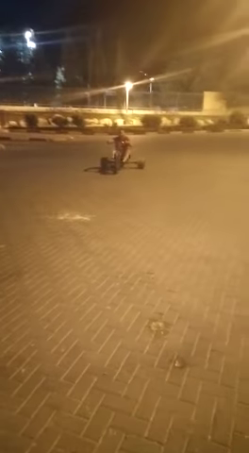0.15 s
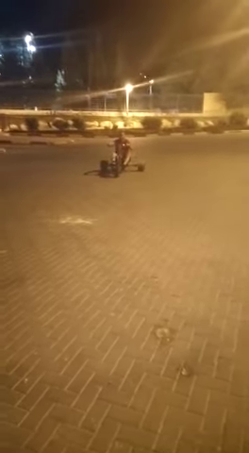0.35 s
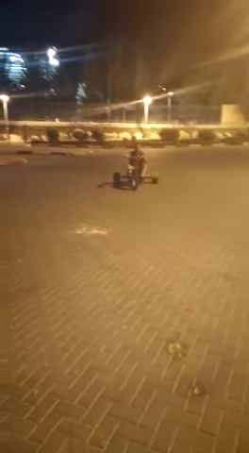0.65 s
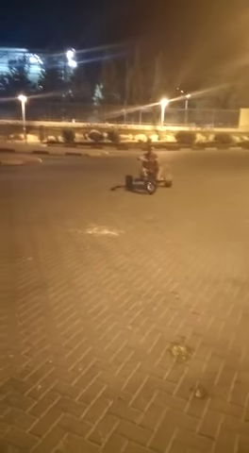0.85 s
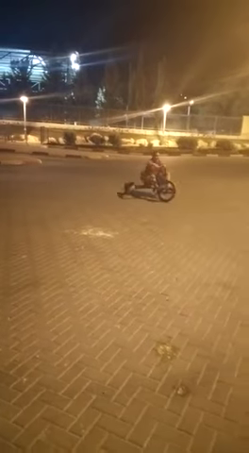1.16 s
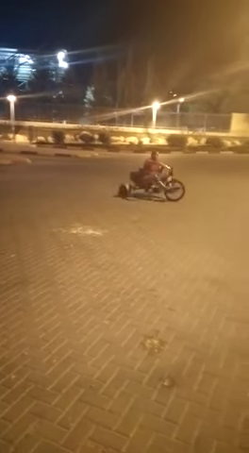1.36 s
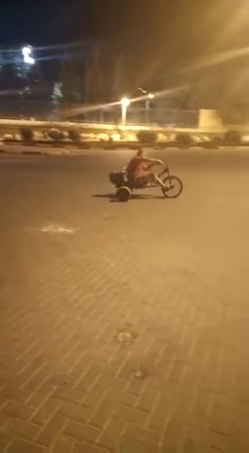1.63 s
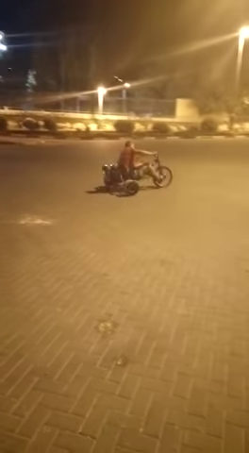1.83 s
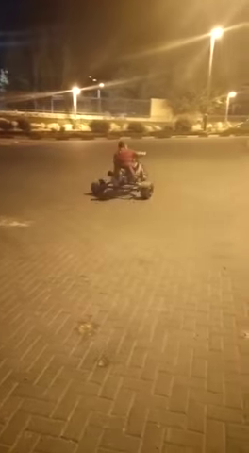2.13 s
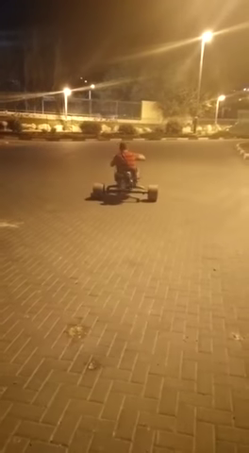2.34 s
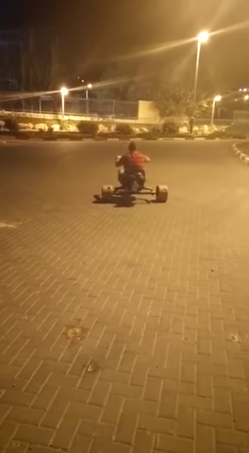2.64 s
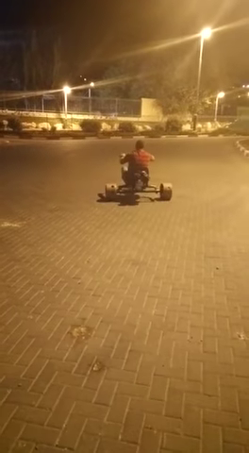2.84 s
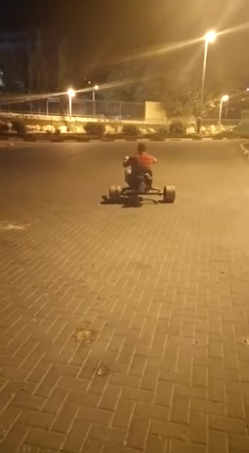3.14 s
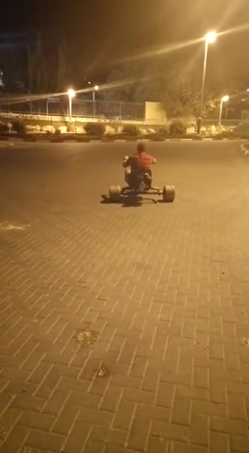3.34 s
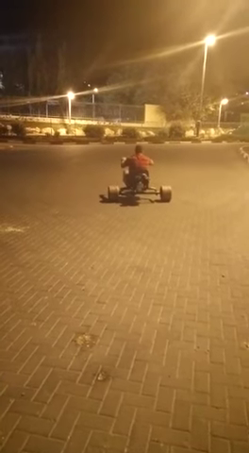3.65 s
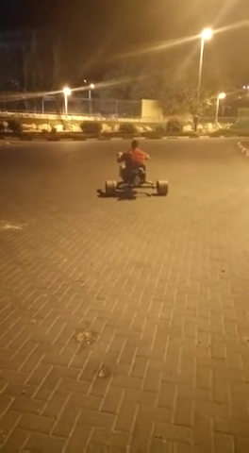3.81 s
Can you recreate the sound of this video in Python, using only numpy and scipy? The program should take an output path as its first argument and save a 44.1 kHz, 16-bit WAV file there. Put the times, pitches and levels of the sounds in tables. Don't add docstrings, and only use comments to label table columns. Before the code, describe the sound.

Small single-cylinder trike engine putters, dips, then revs in bursts as its wheels slide over paving

```python
import sys
import numpy as np
from scipy import signal
from scipy.fft import rfft, irfft, next_fast_len
from scipy.io import wavfile
from scipy.ndimage import uniform_filter1d, map_coordinates

SR = 44100
rng = np.random.default_rng(int(sys.argv[2]) if len(sys.argv) > 2 else 0)


def ratio(d):
    e = np.asarray(d, float) / 20
    return 10 ** e


def waveform_to_disk(signal):
    frames = np.transpose(np.atleast_2d(signal))
    scaled = np.clip(frames, -1, 1) * 32767
    samples = np.round(scaled).astype(np.int16)
    wavfile.write(sys.argv[1], SR, samples)


N = 175518


def unit(x):
    return x / np.sqrt(np.mean(x ** 2) + 1e-20)


def along(points, hz):
    f, v = np.transpose(points)
    return np.interp(np.log(hz + 1), np.log(f + 1), v)


def curves(rows):
    s, *cols = np.transpose(rows)
    return [np.interp(np.arange(N) / SR, s, c) for c in cols]


def wobble(rate):
    knots = rng.standard_normal(int(N * rate / SR) + 4)
    return map_coordinates(knots, [np.arange(N) * rate / SR])


def filtered(x, response):
    m = next_fast_len(x.shape[-1] + 8192)
    spectrum = rfft(x, m) * response(np.fft.rfftfreq(m, 1 / SR))
    return irfft(spectrum, m)[..., :x.shape[-1]]


def peak(f, hz, width):
    return 1j * f * width / (hz * hz - f * f + 1j * f * width)


def hollow(f, resonances, power):
    return sum((-1) ** k * ratio(db) * peak(f, hz, width) ** power
               for k, (hz, width, db) in enumerate(resonances))


def hiss(spectrum, tilt_db=0):
    shape = lambda f: ratio(along(spectrum, f) + tilt_db * np.log2(f / 4000 + 1e-3))
    return unit(filtered(rng.standard_normal(N), shape))


def beats(cycle, place, delay, gain):
    scatter_db, jitter_s = 1.1, .00025
    at = np.flatnonzero(np.diff(np.floor(cycle - place)) > 0)
    chance = rng.standard_normal((len(at), 2))
    late = np.round((delay + jitter_s * chance[:, 0]) * SR).astype(int)
    out = np.zeros(N)
    out[np.clip(at + late, 0, N - 1)] = gain[at] * ratio(scatter_db * chance[:, 1])
    return out


def thump(pushes, hz, width):
    one = filtered(np.eye(1, 4096)[0], lambda f: peak(f, hz, width) ** 3)
    return signal.fftconvolve(pushes, one / np.abs(one).max())[:N]


# (time [s], rate [cycles/s])
PACE = [(0.0, 23.63), (0.378, 23.63), (0.733, 19.15), (0.935, 21.89), (1.467, 22.49), (1.65, 20.79),
        (1.763, 22.74), (2.1, 16.39), (2.554, 15.49), (2.705, 23.0), (2.892, 19.33), (3.072, 22.44),
        (3.197, 20.72), (3.366, 23.73), (3.514, 20.18), (3.67, 24.02), (3.854, 21.66), (3.98, 22.19)]
# (time [s], opening [0-1])
THROTTLE_HAND = [(0, 0.45), (.45, 0.47), (.7, 0.28), (.9, 0.5), (1.79, 0.51), (1.88, 0.35), (2.55, 0.03),
                 (2.6, 0.39), (2.76, 0.95), (2.81, .05), (2.91, 0.18), (2.97, 0.62), (3.06, 0.72),
                 (3.13, 0.34), (3.36, 0.81), (3.42, 0.26), (3.495, 0.23), (3.515, 0.63),
                 (3.54, 0.5), (3.66, 0.83), (3.8, 0.45), (3.87, 0.43), (3.98, 0.5)]
# (time [s], tailpipe [dB], engine side [dB], housing [dB])
TURNING = [(0, -10.5, -0.5, -0.5), (.4, -16.5, -1, -1), (.6, -3.5, 1, -1.5), (.7, -11.5, 0, -3.5),
           (.9, -9.5, -0.5, -1.5), (1.3, -11, 0, -1.5), (1.8, -3.5, 1.5, -5), (2.04, -7.5, 2, -7),
           (2.1, -5, -5, -0.5), (2.17, -1, -0.5, -5), (2.28, 1.5, -4, -7), (2.55, 0.5, 1.5, -12),
           (2.6, 0, 0, -14), (2.87, 0, 0.5, -13), (3.3, 0, 0, -12.5), (3.46, 0, 3.5, -9),
           (3.6, 0, -1, -8.5), (3.98, 2, -1.5, -3)]


def crank():
    cycle = .6 + np.cumsum(curves(PACE)[0]) / SR
    throttle = np.clip(curves(THROTTLE_HAND)[0], 0, 1)
    return cycle, throttle, *curves(TURNING)


def blowdown(cycle, throttle, pipe_db):
    level_db, lead_s = -15, .0026
    blow = thump(beats(cycle, 0, -lead_s, throttle * ratio(level_db + pipe_db)), 175, 380)
    return filtered(blow, lambda f: 1 + ratio(13) * peak(f, 103.3, 23.7) / 2)


def back_breath(cycle, throttle, pipe_db):
    level_db, lead_s = -25, .0002
    pull = (1 - throttle) ** 2 * ratio(level_db + pipe_db)
    return -thump(beats(cycle, 0, -lead_s, pull), 135.4, 190)


# (place [cycle], level throttle shut [dB], level throttle open [dB], resonance [Hz], width [Hz])
BREATHS = [
    (0.2263, -41, -20.5, 194, 204),
    (.53, -40, -23, 308, 193),
    (.83, -46, -24, 314, 222),
    (0.01, -44.5, -29, 291, 140),
    (0.13, -33.5, -40.5, 68, 83),
]


def gulps(cycle, throttle, side_db):
    out = np.zeros(N)
    for place, shut_db, open_db, hz, width in BREATHS:
        level_db = shut_db + (open_db - shut_db) * np.sqrt(throttle) + side_db
        out -= thump(beats(cycle, place, 0, ratio(level_db)), hz, width)
    return out


# (frequency [Hz], width [Hz], level [dB])
HOUSING_RING = [(133.3, 29.4, 4.5), (237, 39, -6.5), (312.7, 74, -3), (382, 34, -15), (510, 55, -8),
                (588.3, 37, -9.5)]


def housing(cycle, throttle, housing_db):
    strikes = beats(cycle, 0.017, 0, 0.14 + throttle)
    return ratio(-32.5 + housing_db) * unit(filtered(strikes, lambda f: hollow(f, HOUSING_RING, 2)))


# (delay [s], level [dB], rise [s], 60 dB decay [s])
GAS_PUFFS = [
    (-.0095, -14, 0.0005, 0.054),
    (.0002, -11.5, 0.00096, 0.036),
]
# (time [s], carburettor slide opening [0-1.3], burn pressure [0-1.3])
BREATHING = [(0, 0.94, 0.61), (1.8, 0.13, 0.52), (1.9, 0.2, 0.54), (2.55, 0, 0.17), (2.58, 1.2, 0.96),
             (2.65, 0.96, 1), (2.69, 0.65, 0.93), (2.74, 0.47, 0.94), (2.79, 0.3, 0.51), (2.89, 0.2, 0.2),
             (2.92, 0.61, 0.53), (2.97, 0.73, 0.7), (3.07, .65, 0.63), (3.11, 0.33, 0.4), (3.2, 0.56, 0.4),
             (3.25, 0.73, 0.68), (3.31, 0.64, .9), (3.4, 0.5, 0.71), (3.49, 0.2, 0), (3.52, 0.86, 0.64),
             (3.58, .75, 1.1), (3.63, 0.6, 0.85), (3.71, 0.4, 0.71), (3.78, 0.25, 0.3), (3.88, 0.36, 0.41),
             (3.98, 0.47, 0.65)]
# (frequency [Hz], level per Hz [dB])
SPIT_COLOUR = [(900, -32), (2000, -9.5), (3900, -8), (5500, -6), (7900, -1.5), (9000, -9.5), (11000, -15.5),
               (15600, -22)]
# (frequency [Hz], level per Hz [dB])
BARK_COLOUR = [(600, -19), (1500, -5), (2000, -1.5), (2600, -8), (3100, -1), (4600, -1.5), (7800, -7),
               (15600, -34)]


def puffs(cycle, pipe_db):
    growth, facing, cruise_rate = 1.78, 1.55, 19.9
    slopes = [1.45, 0.45]
    drives = np.clip(curves(BREATHING), 0, 1.3)
    t = np.arange(SR // 10) / SR
    out = np.zeros(N)
    for puff, slope_db, drive, colour in zip(GAS_PUFFS, slopes, drives, [SPIT_COLOUR, BARK_COLOUR]):
        delay, db, rise, t60 = puff
        level_db = db + slope_db * (curves(PACE)[0] - cruise_rate) + facing * pipe_db
        shape = (1 - np.exp(-t / rise)) * ratio(-60 * t / t60)
        firings = beats(cycle, 0, delay, drive ** growth * ratio(level_db))
        gate = signal.fftconvolve(firings, shape)[:N]
        out += gate * ratio(1.6 * wobble(900)) * hiss(colour)
    return out


# (frequency [Hz], level per Hz [dB])
GAS_COLOUR = [(530, -30), (900, -2.5), (2030, 2), (2800, -6), (3110, 0), (3510, -9), (8190, -10),
              (9120, -23), (15600, -34)]


def gas_flow(throttle, pipe_db):
    flow = np.abs(uniform_filter1d(throttle, int(.12 * SR)))
    level_db = -36 + 1.55 * pipe_db + 2.5 * wobble(66)
    return flow * ratio(level_db) * hiss(GAS_COLOUR, 12)


# (multiple of the cycle rate, level [dB], phase [rad])
SHAKING = [
    (2, -43.5, 0.099),
    (3, -37.5, 0.48),
]


def block_shake(cycle, throttle, side_db):
    hum = sum(ratio(db + wobble(5.3)) * np.sin(2 * np.pi * k * cycle + turn) for k, db, turn in SHAKING)
    return (0.095 + throttle) * ratio(side_db) * hum


# (frequency [Hz], level per Hz [dB])
CLATTER_COLOUR = [(60, -40), (200, -33), (330, -20), (600, -7), (950, -16.5), (2000, -12), (7000, -30.5),
                  (15800, -36)]


def clatter(cycle, throttle, side_db):
    pulse_db = np.cos(4 * np.pi * (cycle - 0.053))
    swell_db = pulse_db + 3.14 * wobble(120) + 3 * throttle + side_db
    return ratio(-45 + swell_db) * hiss(CLATTER_COLOUR)


def engine():
    cycle, throttle, pipe_db, side_db, housing_db = crank()
    out = blowdown(cycle, throttle, pipe_db) + back_breath(cycle, throttle, pipe_db)
    out += gulps(cycle, throttle, side_db) + housing(cycle, throttle, housing_db)
    out += puffs(cycle, pipe_db) + gas_flow(throttle, pipe_db)
    return out + block_shake(cycle, throttle, side_db) + clatter(cycle, throttle, side_db)


# (time [s], scrape [dB], drone over scrape [dB], share of brighter fine grit [0-1])
SLIDING = [(0, -44, 5, 1), (.25, -33, -7, 0.5), (.52, -28, -5, 0.94), (.72, -29, -6, 1),
           (.92, -37.5, -2.5, 0.25), (1.05, -48, 7, 0.5), (1.43, -38.5, -1, 0), (1.71, -27, -4, 0.2),
           (1.95, -31.5, -3.5, 0.4), (2.05, -34.5, -5.5, 0.53), (2.33, -35, -6, 0.5),
           (2.4, -31, -8.5, 0.15), (2.47, -37.5, -5, 0), (2.53, -41.5, -1.5, 0), (2.64, -36, -2, 0),
           (2.78, -33.5, -9, 0.12), (3.34, -34.5, -7.5, 0.8), (3.46, -33.5, -8, 1), (3.98, -35, -7.5, 0.26)]
# (frequency [Hz], level per Hz [dB])
SCRAPE_COLOUR = [(530, -78), (900, -8), (1120, -11), (2260, -7.5), (3150, -6.5), (3510, -12.5),
                 (3770, -8.5), (7710, -10.5), (15600, -46)]
# (frequency [Hz], width [Hz], level [dB])
SLEEVE_HOLLOW = [(480, 41, -0.5), (599, 72, -2), (780, 380, -7.5), (1100, 69, 0)]


def sleeves():
    grit_rate, grit_db, fine_tilt_db = 500, -9, 5
    scrape_db, drone_db, fine = curves(SLIDING)
    fine = fine.clip(0, 1)
    rub = np.sqrt(1 - fine) * hiss(SCRAPE_COLOUR) + np.sqrt(fine) * hiss(SCRAPE_COLOUR, fine_tilt_db)
    grains = (rng.random(N) < grit_rate / SR) * rng.standard_normal(N)
    grains = grains * ratio(7.5 * rng.exponential(size=N).clip(0, 2))
    grit = unit(filtered(grains, lambda f: ratio(along(SCRAPE_COLOUR, f))))
    scrape = ratio(0.62 * wobble(11) + 2.2 * wobble(60)) * unit(rub + ratio(grit_db) * grit)
    drive = ratio(1.5 * wobble(30) + 2.6 * wobble(250)) * rng.standard_normal(N)
    drone = unit(filtered(drive, lambda f: hollow(f, SLEEVE_HOLLOW, 1)))
    return ratio(scrape_db) * (scrape + ratio(drone_db) * drone)


# (time [s], length [s], from [Hz], to [Hz], level [dB])
STICK_SLIP = [
    (0.458, .3, 585, 570, -36),
    (0.614, 0.16, 480, 490.4, -35),
    (1.608, 0.317, 486.7, 516.6, -32.5),
    (1.725, 0.23, 619, 643, -38),
]


def squeals():
    out, t = np.zeros(N), np.arange(N) / SR
    for s, length, from_hz, to_hz, db in STICK_SLIP:
        u = np.clip((t - s) / length, 0, 1)
        hz = from_hz + (to_hz - from_hz) * u + 7 * wobble(39.9)
        tone = np.sin(2 * np.pi * np.cumsum(hz) / SR)
        out += ratio(db + 4.6 * wobble(34.57)) * np.sin(np.pi * u) * tone
    return out


# (time [s], peak level [dB], favoured resonance [Hz], brightness [dB per octave])
JOINTS = [(.48, -14.5, 6400, -1), (0.62, -14.5, 1046, -33), (1.146, -28.5, 3020, 8), (1.234, -30, 1160, -3),
          (1.4076, -2.5, 2490, -8), (1.628, -24, 1000, -23), (1.632, -8, 2660, -1),
          (1.714, -13, 1990, -2.5), (1.756, -22, 3180, 9), (1.787, -18, 1100, -15),
          (1.918, -13.5, 1100, -12), (2.316, -28, 1190, -11), (2.42, -19, 1100, -20),
          (2.43, -21, 1100, -27)]
# (frequency [Hz], width [Hz], level [dB])
SLEEVE_EDGE = [(1028, 175, 14.5), (1400, 210, 6), (1986, 67, -19), (3360, 310, 3.5), (4550, 1200, 2.5)]


def knocks():
    rise_s, t60, low_hz = .0012, .036, 950
    out, t = np.zeros(N + SR), np.arange(SR // 10) / SR
    for s, db, hz, tilt_db in JOINTS:
        hold = .0045 if db > -5 else .0022
        shape = (1 - np.exp(-t / rise_s)) * ratio(-60 * np.maximum(t - hold, 0) / t60)

        def colour(f):
            bright = ratio(tilt_db * np.log2(f / hz + 0.0012).clip(0))
            body = peak(f, 3 * low_hz, 6 * low_hz) ** 2 / (1 + (low_hz / (f + 1)) ** 8) ** .5
            edge = .5 + sum(ratio(g) * peak(f, c, w) for c, w, g in SLEEVE_EDGE)
            return bright * body * edge + ratio(10) * peak(f, hz, hz / 9)
        burst = filtered(shape * rng.standard_normal(len(t)), colour)
        out[round(s * SR):][:len(t)] += ratio(db) * burst / np.abs(burst).max()
    return out[:N]


def off_ground(x):
    delay_s, gain, turn, top_hz = .00164, .55, .8, 5000

    def echo(f):
        late = np.exp(1j * (turn - 2 * np.pi * f * delay_s))
        return gain * late * f / (f + 100) / (1 + (f / top_hz) ** 2)
    return filtered(x, lambda f: 1 + echo(f))


def yard(x):
    t60, gap_s, low_hz = .25, .012, 1000
    t = np.arange(SR // 3) / SR
    tail = rng.standard_normal((2, len(t))) * ratio(-60 * t / t60) * (t > gap_s)
    wet = signal.fftconvolve(x[None], tail / np.linalg.norm(tail[0]), axes=1)[:, :N]
    return filtered(wet, lambda f: f * f / (f * f + low_hz ** 2))


def scene():
    trike = engine() + sleeves() + squeals() + knocks()
    return off_ground(trike) + ratio(-13) * yard(trike)


def roll_off(x):
    return signal.sosfilt(signal.butter(12, 16500, fs=SR, output="sos"), x)


# (frequency [Hz], correlation [-1 to 1])
PORT_LIKENESS = [(150, 1), (300, 0.9), (600, 0.75), (1200, 0.13), (2500, -0.0087), (5000, -0.19),
                 (9000, -0.43), (15000, 0.25)]
# (frequency [Hz], left over right [dB])
PORT_LEAN = [(60, -1.5), (200, 1), (700, 0.5), (1300, 0.5), (2400, 1.5), (4400, 3), (8000, -7),
             (15000, -5.5)]


def record(dry):
    spread_s, lag_s, low_cut_hz, top_hz = .003, .00002, 38, 16000
    sway_hz, sway_rate, sway_turn = 2300, 25, 1.2
    smears = rng.standard_normal((2, 4096)) * np.exp(-np.arange(4096) / (spread_s * SR))
    turn = lambda f: np.arccos(np.clip(along(PORT_LIKENESS, f), -1, 1)) / 2
    high = lambda f: f ** 4 / (f ** 4 + sway_hz ** 4)

    def ports(f):
        lag = np.exp(-1j * np.pi * f * lag_s / (1 + (f / 1500) ** 2))
        lean = ratio(along(PORT_LEAN, f) / 2) * lag
        return np.array([lean, 1 / lean]) * (f < top_hz) / (1 + (low_cut_hz / (f + 1)) ** 8)

    def common(f):
        return np.cos(turn(f)) + (1 - high(f)) * np.sin(turn(f)) * [[-1j], [1j]]

    def other(f, smear):
        z = rfft(smear, 2 * len(f) - 2)
        even = z / np.sqrt(uniform_filter1d(np.abs(z) ** 2, size=len(f) // 500))
        return np.sin(turn(f)) * even * [[1], [-1]]
    sway = sway_turn * wobble(sway_rate)
    heard = filtered(dry, common)
    for smear, share in zip(smears, [np.cos(sway), np.sin(sway)]):
        heard = heard + share * filtered(dry, lambda f: high(f) * other(f, smear))
    return roll_off(filtered(heard, ports))


dry = scene()
out = record(dry)
waveform_to_disk(out)
```